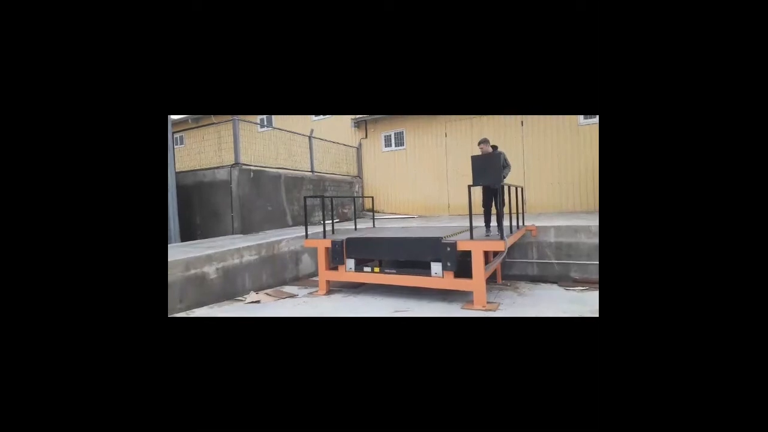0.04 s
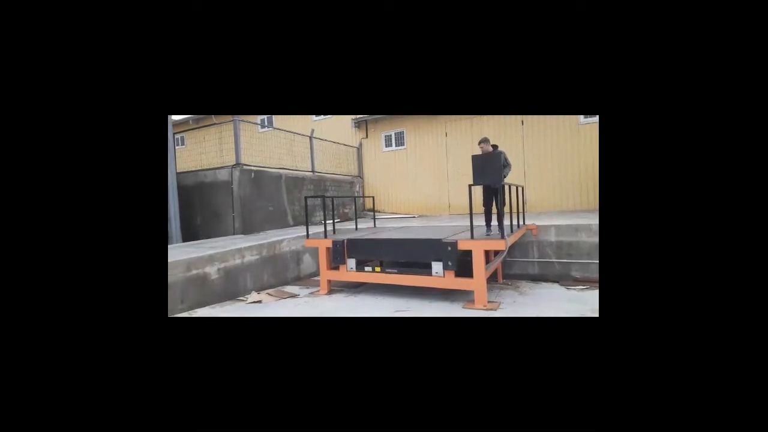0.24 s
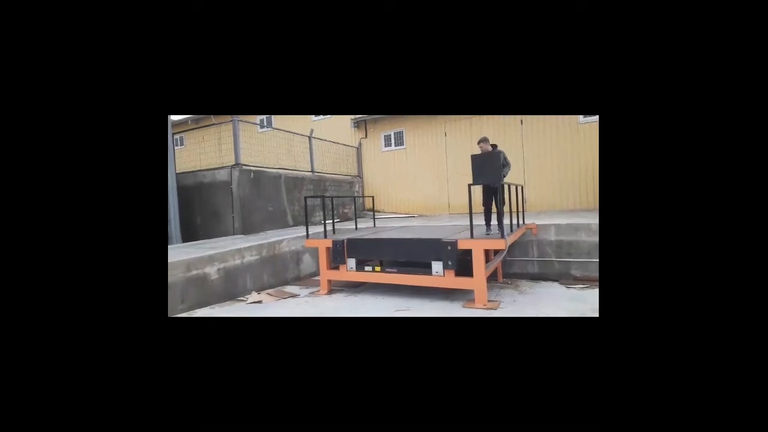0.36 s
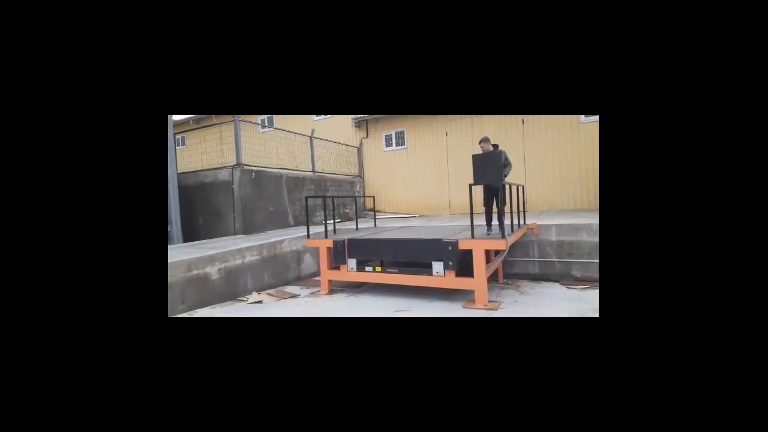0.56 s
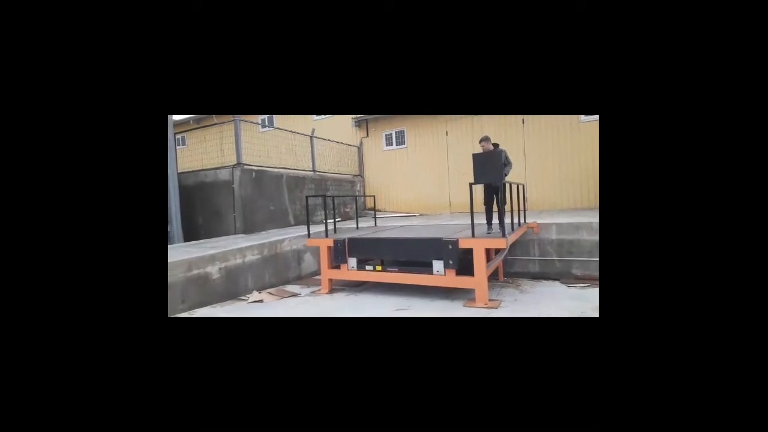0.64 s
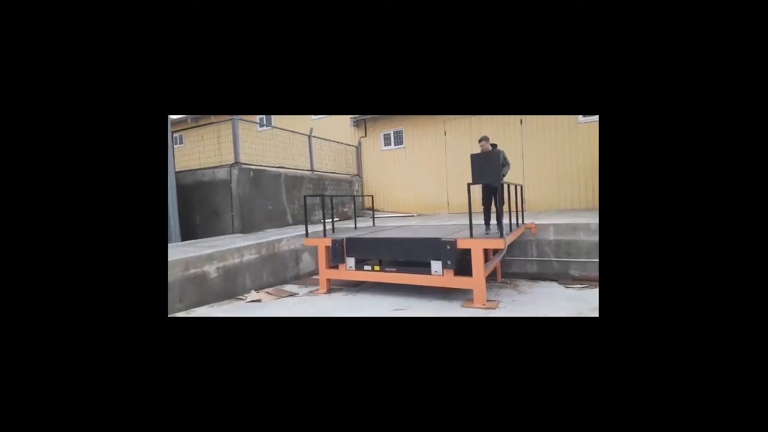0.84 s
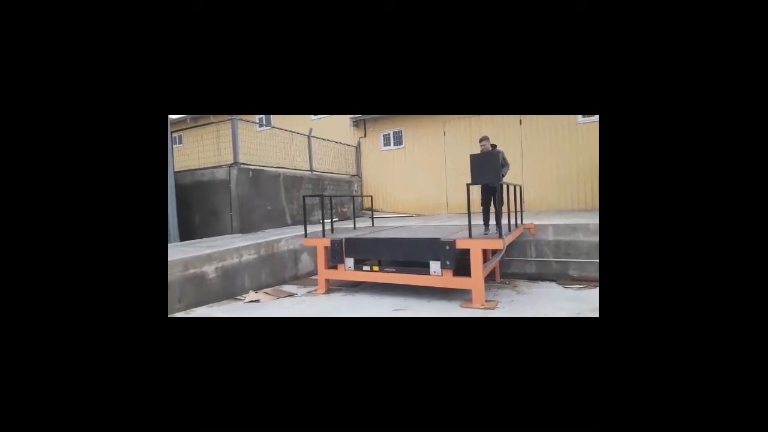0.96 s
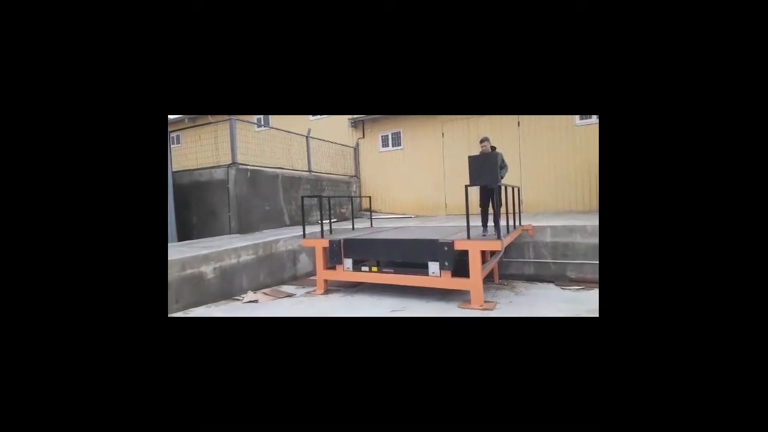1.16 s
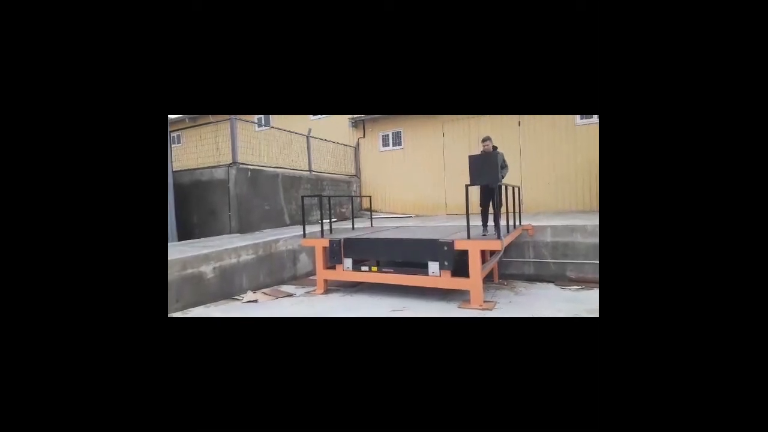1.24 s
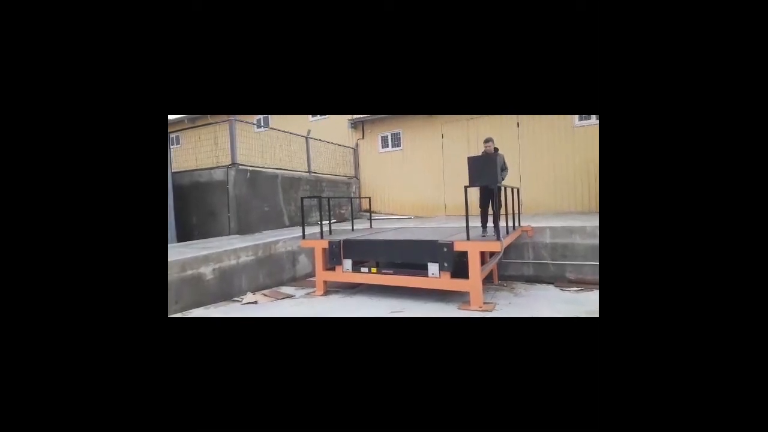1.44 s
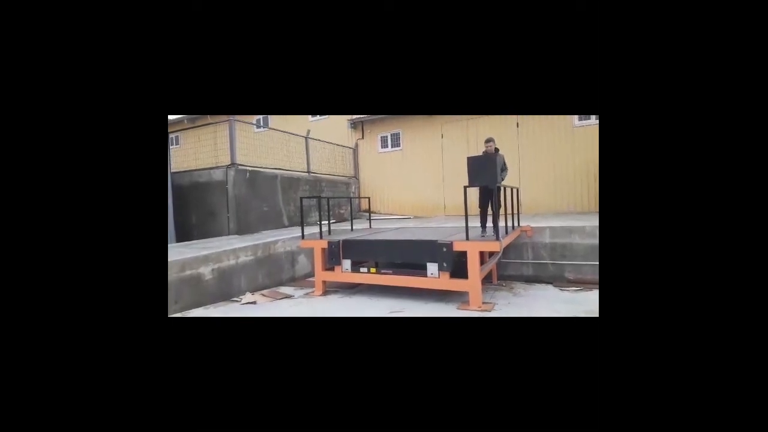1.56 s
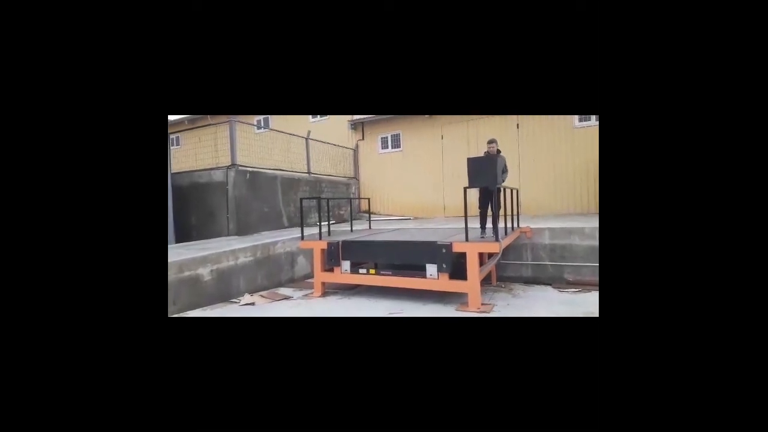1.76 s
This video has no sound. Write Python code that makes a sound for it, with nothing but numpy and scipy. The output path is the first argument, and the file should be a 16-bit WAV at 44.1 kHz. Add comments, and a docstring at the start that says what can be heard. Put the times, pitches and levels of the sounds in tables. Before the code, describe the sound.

A heavy steel dock plate slams onto its frame, clattering briefly, then rumbling away across a concrete yard

```python
"""Steel dock plate drop

A heavy steel plate drops onto its frame: the lip clacks, the deck slams, rebounds and chatters to rest.
Each contact is a thud, coloured noise that dies away, and a set of fading sine waves for the deck's modes.
The concrete yard and far walls answer with a long noise tail and echoes, over a deep rumble.
Soft low bumps and faint rustles follow; outdoor air and a fading hiss lie underneath."""
import sys
import numpy as np
from scipy import signal
from scipy.fft import rfft, irfft, next_fast_len
from scipy.io import wavfile
from scipy.ndimage import map_coordinates

SR = 44100
rng = np.random.default_rng(int(sys.argv[2]) if len(sys.argv) > 2 else 0)


def log_audio(samples):
    """Write samples as a 16-bit WAV file to the path given in sys.argv[1]."""
    # one column per channel
    frames = np.atleast_2d(samples).T
    # limit to full scale, then quantise
    limited = np.clip(frames, -1, 1)
    pcm = np.round(limited * 32767).astype(np.int16)
    wavfile.write(sys.argv[1], SR, pcm)


N = 79380
T = np.arange(N) / SR  # time [s]

# In all tables, "fall time" is the time to drop by 60 dB.
# In likeness tables, 1 means left and right are the same, 0 unrelated, below 0 opposed.

# The lip's dead, short clack: (frequency [Hz], level [dB])
LIP_TONES = [(720, -11.5), (1270, 0.5), (1580, -6.5), (2100, -16.5)]
LIP_START_S, LIP_DB, LIP_RISE_S, LIP_FALL_S = 0.1988, 8, 0.0023, 0.011

# Contacts of the plate: (time [s], clang level [dB], boom level [dB], bright edge level [dB])
CONTACTS = [(0.2000, -23, -21, -51), (0.2070, -21.5, -20.5, -31), (0.2266, -22, -21.5, -41.5),
            (0.2555, -18.5, -25.5, -40), (0.2620, -21, -20, -47.5), (0.2735, -20.5, -18, -21.5),
            (0.2965, -19, -22, -39), (0.3106, -25.5, -22.5, -44), (0.3480, -23.5, -29, -41),
            (0.3850, -35.5, -26, -57.5), (0.4120, -40.5, -28, -52.5), (0.4560, -44, -31.5, -58),
            (0.4810, -44, -28.5, -60.5)]
# Colour of the clang: (frequency [Hz], level [dB])
CLANG_COLOUR = [(300, -17), (430, -10.5), (540, -1), (680, -2), (820, -2.5), (1000, -7), (1400, -4),
                (1750, -4), (2150, -4.5), (2700, -10.5), (3300, -15), (4000, -23.5), (7000, -36.5),
                (15000, -62.5)]
# How long the clang rings: (frequency [Hz], fall time [s])
CLANG_FALL = [(400, 0.76), (900, 0.59), (2000, .38), (5000, 0.3)]
# Colour of the deck's boom: (frequency [Hz], level [dB])
BOOM_COLOUR = [(20, -63.5), (50, -27.5), (85, -5), (108, -15.5), (150, -4), (200, -0.5), (260, -6),
               (330, -10), (450, -20.5), (900, -48.5), (3000, -93)]
# How long the boom rings: (frequency [Hz], fall time [s])
BOOM_FALL = [(60, 0.4), (170, 0.43), (400, 0.96)]
# Colour of the bright edge: (frequency [Hz], level [dB])
EDGE_COLOUR = [(800, -50), (2200, 9), (3300, -0.5), (3800, -4), (4450, 0.5), (5200, -6), (6200, -17),
               (8000, -27.5), (12000, -32), (15500, -37.5)]
# How long the bright edge rings: (frequency [Hz], fall time [s])
EDGE_FALL = [(3000, 0.095), (5000, 0.41), (9000, 0.41)]
# Stereo likeness of the plate: (frequency [Hz], likeness [-1 to 1])
PLATE_ALIKE = [(40, 0.63), (110, 1), (200, 1), (320, 0.9), (640, .85), (1400, 0.57), (3100, 0.36),
               (5000, 0), (7500, 0), (15000, 0)]
CLANG_PAN_DB = -1  # left over right; the lip gets it twice
ATTACK_S, BOOM_ATTACK_S = 0.002, 0.0054
THUD_DB, THUD_HZ, THUD_PEAK_S = 2.5, 166, 0.0067
BITE, BITE_FALL_S = 1.0, 0.12  # extra gain at the start of each contact
RATTLE_DB, RATTLE_PER_S = 1, 260  # typical size of the random steps, and how many per second

# The plate's strongest modes: (frequency [Hz], level [dB], fall time [s])
STEEL_MODES = [(87, -18, 0.85), (162.3, -6, 0.98), (165.7, -23, 2.6), (195, -16.5, 1.6), (243, -8.5, 0.68),
               (269.86, -9.5, 0.49), (343.5, -19, 0.52), (511, -13, 0.27), (584, -11.5, 0.42),
               (636, -12.5, .5), (1527, -19.5, 0.29), (1647, -13.5, 0.54), (1941, -18, 0.42),
               (2200, -15.5, .4), (2918, -15.5, .35), (3480, -11, 0.63), (4370, -6, .22), (4650, -14, .24)]
# Where modes follow the boom, the clang (twice) and the edge: (frequency [Hz])
MODE_DRIVE_HZ = [330, 560, 2100, 3400]
MODES_DB, MODE_SCATTER_DB = -0.5, 1.5
MAX_RING_CYCLES = 1100  # longest fall time of a mode, counted in its own cycles

# Colour of the yard's tail: (frequency [Hz], level [dB])
YARD_TONE = [(40, 9.5), (170, -6), (300, 0.5), (700, -8), (1200, -9), (2000, -8.5), (3000, -16),
             (5000, -11.5), (12000, -6.5)]
# How long the yard's tail lasts: (frequency [Hz], fall time [s])
YARD_FALL = [(60, 3.3), (180, 1.5), (600, 1.82), (2000, 2.1), (5000, 2), (10000, 0.71)]
# Stereo likeness of the surroundings: (frequency [Hz], likeness [-1 to 1])
AROUND_ALIKE = [(60, 0.0075), (140, .93), (290, 0.89), (640, .5), (1400, -0.27), (3100, 0.085)]
YARD_DB, YARD_BUILD_S = -19.5, 0.034
# Echoes from far walls: (delay [s], level [dB])
WALL_ECHOES = [(.47, -31), (.66, -36.5), (.99, -43)]
# Colour of the echoes: (frequency [Hz], level [dB])
ECHO_TONE = [(60, 7), (180, -1.5), (350, 3), (650, -1), (1100, -3), (2000, -8.5), (3000, -16), (5000, -19),
             (12000, -3.5)]
ECHO_FALL_S = 0.2

# Colour of the deep rumble: (frequency [Hz], level [dB])
RUMBLE_COLOUR = [(20, -24.5), (55, 4), (90, -3), (140, -7), (300, -23.5), (1000, -68.5)]
RUMBLE_START_DB, RUMBLE_FALL_DB_PER_S = -53.5, 2

# Soft low bumps: (time [s], level [dB], frequency [Hz])
SOFT_BUMPS = [(0.589, -27.5, 160), (0.604, -23.5, 193), (.64, -31, 74.5), (.715, -29, 159.8),
              (.73, -31.5, 81), (0.867, -38.5, 182), (0.964, -39, 170.3), (1.082, -38, 170),
              (1.188, -41, 85.9), (1.28, -42, 106.3), (1.384, -43, 118.8), (1.447, -43, 79.2),
              (1.542, -44, 130), (1.625, -46, 85), (1.77, -42, 128)]
BUMP_PEAK_S, BUMP_NOISE = 0.0063, 0.28  # time to the peak, amount of noise beside the tone

# Faint rustles: (time of the middle [s], level [dB])
FAINT_RUSTLES = [(0.528, -61.5), (.615, -66), (.83, -70), (1.07, -82), (1.135, -72.5), (1.285, -72)]
# Colour of the rustles: (frequency [Hz], level [dB])
RUSTLE_COLOUR = [(2000, -0.5), (4500, 3.5), (8000, 0.5), (12000, -11), (15500, -16)]
RUSTLE_WIDTH_S = 0.028

# Course of the hiss: (time [s], level [dB])
HISS_COURSE = [(0, -53), (.19, -53), (.3, -50), (.44, -61.5), (.7, -80.5), (1.0, -82), (1.8, -85)]
# Colour of the hiss: (frequency [Hz], level [dB])
HISS_COLOUR = [(590, -24.5), (1000, -5.5), (1160, -15), (1440, -3), (5040, -6), (12300, -2.5), (15500, -6)]
# Course of the outdoor air: (time [s], level [dB])
AIR_COURSE = [(0, -51.5), (.3, -56), (1.0, -56.5), (1.7, -65)]
# Colour of the outdoor air: (frequency [Hz], level [dB])
AIR_COLOUR = [(25, -8), (60, -2.5), (110, -6.5), (250, -6.5), (450, -11.5), (750, -12.5), (1200, -21),
              (2500, -27), (4000, -36.5), (7000, -41), (15000, -55)]

LOW_CUT_HZ, TOP_HZ = 38, 15800  # the microphone's bass roll-off, and the upper band limit
PEAK = 0.92  # ceiling for the rounded peaks


def amp(db):
    """Turn decibels into a gain."""
    return 10 ** (np.asarray(db) / 20)


def unit(x):
    """Scale to an rms (average strength) of 1."""
    return x / np.sqrt(np.mean(x ** 2) + 1e-20)


def along(points, hz):
    """Read a (frequency, value) table between its points, on a log frequency axis."""
    f, value = np.transpose(points)
    return np.interp(np.log(hz + 1), np.log(f + 1), value)


def course(points):
    """Turn a (time, level) table into a gain for every sample."""
    return amp(np.interp(T, *np.transpose(points)))


def delayed(x, s):
    """Start x later by s seconds."""
    start = max(round(s * SR), 0)
    return np.pad(x, ((0, 0), (start, 0)))[:, :N]


def fall(t, t60):
    """Fade exponentially, by 60 dB in t60 seconds."""
    return np.exp(-np.log(1000) * t / np.maximum(t60, 1e-3))


def swell_in(attack):
    """Rise smoothly from silence to full level."""
    return 1 - np.exp(-T / attack)


def noise(colour, alike):
    """Make stereo noise of rms 1 with a given colour and left-right likeness."""
    hz = np.fft.rfftfreq(N, 1 / SR)
    # the more alike the two sides, the more "mid" (shared) and the less "side" (opposite) sound
    turn = np.arccos(np.clip(along(alike, hz), -1, 1)) / 2
    coloured = rfft(rng.standard_normal((2, N))) * amp(along(colour, hz))
    mid, side = irfft(coloured * [np.cos(turn), np.sin(turn)], N)
    return unit(np.array([mid + side, mid - side]))


def ring(colour, t60, alike, attack):
    """Noise standing for a crowd of close modes, each frequency dying at its own speed."""
    hz, t, spectrum = signal.stft(noise(colour, alike), SR, nperseg=512)
    fading = spectrum * fall(t, along(t60, hz)[:, None])
    x = signal.istft(fading, SR, nperseg=512)[1][:, :N]
    return x * swell_in(attack)


def plate():
    """The lip lands, then the deck hits again and again; returns the crash and the ringing modes."""
    pan = amp(np.array([[CLANG_PAN_DB], [-CLANG_PAN_DB]]) / 2)
    crash = delayed(pan ** 2 * lip_clack(), LIP_START_S)
    ringing = 0
    thud = deck_thud()
    bite = 1 + BITE * fall(T, BITE_FALL_S)
    for s, clang_db, boom_db, edge_db in CONTACTS:
        clang = amp(clang_db) * pan * ring(CLANG_COLOUR, CLANG_FALL, PLATE_ALIKE, ATTACK_S)
        boom = amp(boom_db) * (thud + ring(BOOM_COLOUR, BOOM_FALL, PLATE_ALIKE, BOOM_ATTACK_S))
        edge = amp(edge_db) * ring(EDGE_COLOUR, EDGE_FALL, PLATE_ALIKE, ATTACK_S)
        crash = crash + delayed(bite * rattle() * (clang + edge) + boom, s)
        ringing = ringing + delayed(deck_modes(boom_db, clang_db, edge_db), s)
    return crash, ringing


def lip_clack():
    """The lip's first touch: a few tones that rise fast and die almost at once."""
    tones = sum(amp(db) * np.sin(2 * np.pi * hz * T) for hz, db in LIP_TONES)
    rise = 1 - np.exp(-(T / LIP_RISE_S) ** 2)
    return amp(LIP_DB) * tones * rise * fall(T, LIP_FALL_S)


def deck_thud():
    """The short push of air under the deck, as a low tone lasting a moment."""
    swell = T / THUD_PEAK_S * np.exp(1 - T / THUD_PEAK_S)
    return amp(THUD_DB) * np.sin(2 * np.pi * THUD_HZ * T) * swell


def rattle():
    """Loose steel makes the clang and edge grainy: a fast random flutter of level."""
    knots = rng.standard_normal(N // 50)
    flutter = map_coordinates(knots, [T * RATTLE_PER_S], mode="mirror")  # smooth curve through the knots
    return unit(amp(RATTLE_DB * flutter))


def deck_modes(boom_db, clang_db, edge_db):
    """The strongest modes, struck a little differently each time; friction limits the high ones' ringing."""
    hz, db, t60 = np.transpose(STEEL_MODES)[:, :, None]
    drive_db = np.interp(hz, MODE_DRIVE_HZ, [boom_db, clang_db, clang_db, edge_db])
    size = amp(MODES_DB + drive_db + db + MODE_SCATTER_DB * rng.standard_normal(hz.shape))
    wave = np.sin(2 * np.pi * (hz * T + rng.random(hz.shape)))
    fading = fall(T, np.minimum(t60, MAX_RING_CYCLES / hz))
    return (size * wave * fading).sum(0)[None] * swell_in(ATTACK_S)


def yard(crash):
    """The concrete yard's long diffuse tail, with smeared echoes from far walls."""
    tail = ring(YARD_TONE, YARD_FALL, AROUND_ALIKE, YARD_BUILD_S)
    answer = amp(YARD_DB) * tail / np.linalg.norm(tail[0])
    for s, db in WALL_ECHOES:
        echo = noise(ECHO_TONE, AROUND_ALIKE) * fall(T, ECHO_FALL_S)
        answer = answer + delayed(amp(db) * echo / np.linalg.norm(echo[0]), s)
    # convolution: every instant of the crash sets off the whole answer
    return signal.fftconvolve(crash.mean(0)[None], answer, axes=1)[:, :N]


def rumble():
    """Deep noise that starts with the crash and hardly fades."""
    level = amp(RUMBLE_START_DB - RUMBLE_FALL_DB_PER_S * T)
    return delayed(level * noise(RUMBLE_COLOUR, AROUND_ALIKE), LIP_START_S)


def bumps():
    """Short, dull thuds: a low tone and some boomy noise that swell and fade together."""
    u = T / BUMP_PEAK_S
    out = np.zeros((2, N))
    for s, db, hz in SOFT_BUMPS:
        thud = np.sin(2 * np.pi * hz * T) + BUMP_NOISE * noise(BOOM_COLOUR, AROUND_ALIKE)
        out += delayed(amp(db) * thud * u * np.exp(1 - u), s)
    return out


def rustles():
    """Faint bright noise that swells up briefly, in bell-shaped puffs."""
    swells = sum(amp(db) * np.exp(-((T - s) / RUSTLE_WIDTH_S) ** 2 / 2) for s, db in FAINT_RUSTLES)
    return swells * noise(RUSTLE_COLOUR, PLATE_ALIKE)


def hiss():
    """Steady bright noise whose level follows its course and fades away."""
    return course(HISS_COURSE) * noise(HISS_COLOUR, AROUND_ALIKE)


def air():
    """Outdoor background: mostly low noise that slowly drops in level."""
    return course(AIR_COURSE) * noise(AIR_COLOUR, AROUND_ALIKE)


def scene():
    """The crash in its yard; the yard answers the crash but not the separate ringing modes."""
    crash, ringing = plate()
    background = rustles() + hiss() + air()
    return crash + ringing + yard(crash) + rumble() + bumps() + background


def record(dry):
    """The microphone thins the deepest bass; then peaks are rounded and the top is cut off."""
    bass_cut = signal.butter(2, LOW_CUT_HZ, "high", fs=SR, output="sos")
    heard = signal.sosfilt(bass_cut, dry)
    rounded = heard / (1 + np.abs(heard / PEAK) ** 10) ** (1 / 10)
    m = next_fast_len(N + SR // 2)  # spare silence, so the end does not wrap round to the start
    kept = np.fft.rfftfreq(m, 1 / SR) < TOP_HZ
    return irfft(rfft(rounded, m) * kept, m)[:, :N]


dry = scene()
out = record(dry)
log_audio(out)
```